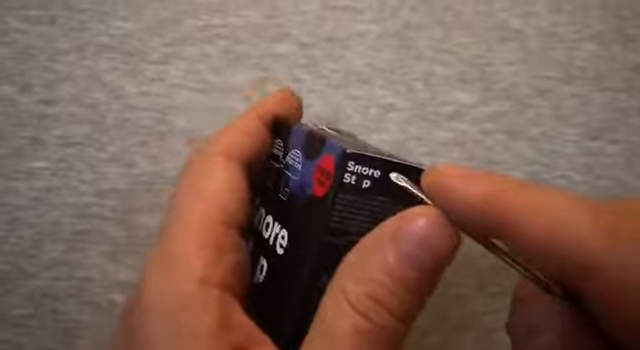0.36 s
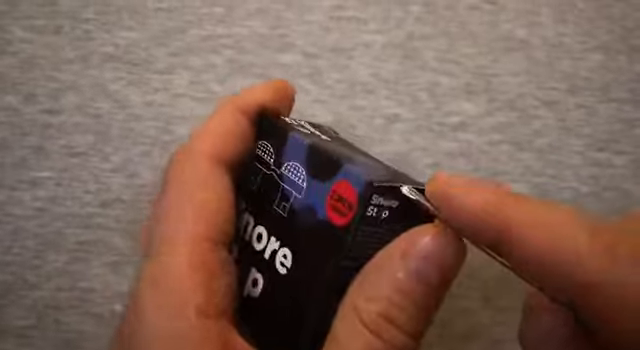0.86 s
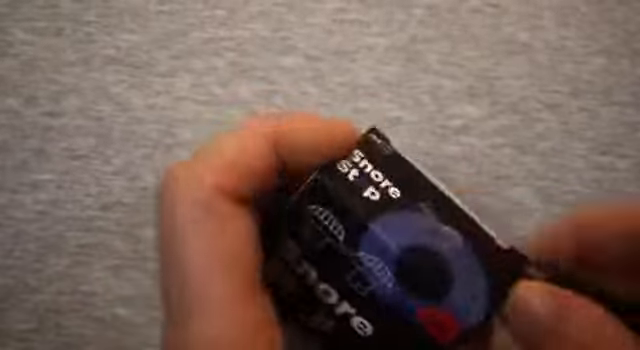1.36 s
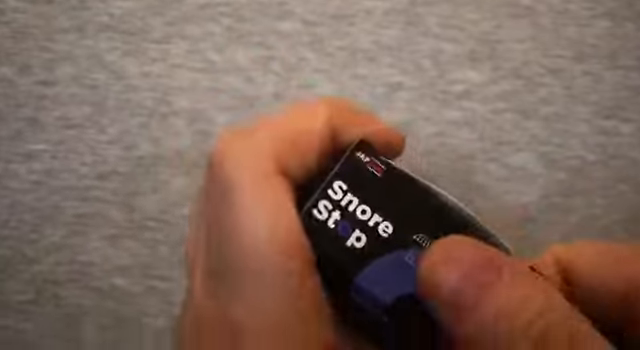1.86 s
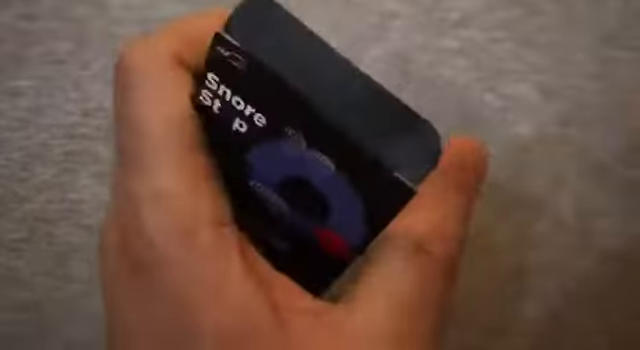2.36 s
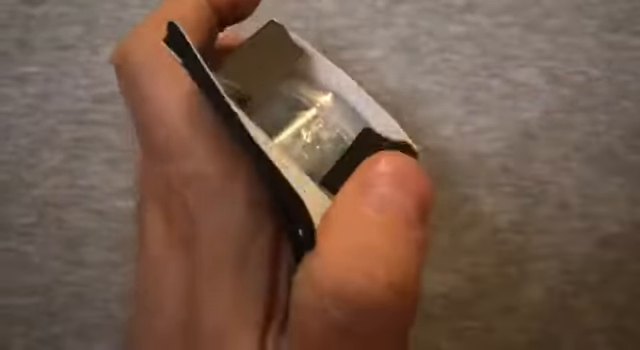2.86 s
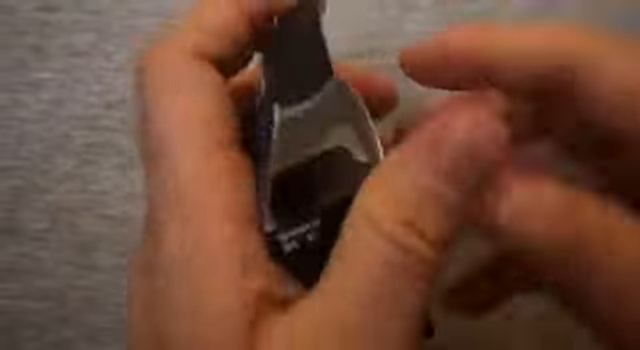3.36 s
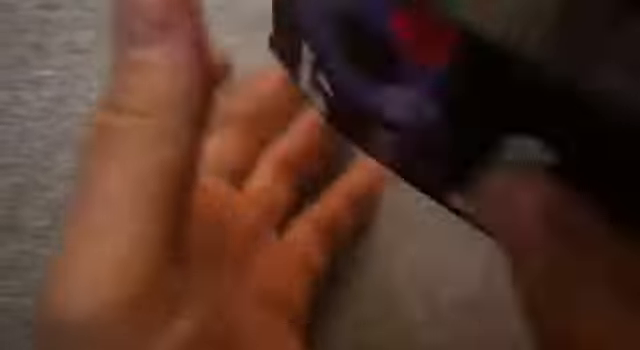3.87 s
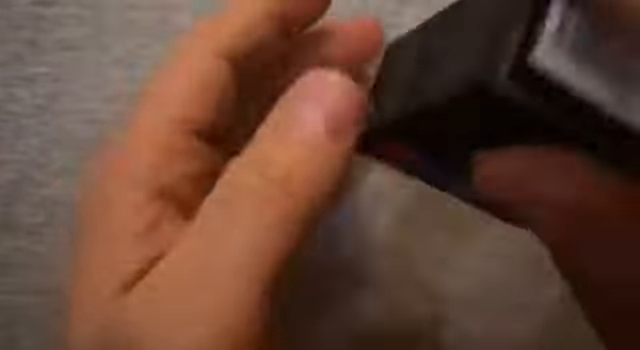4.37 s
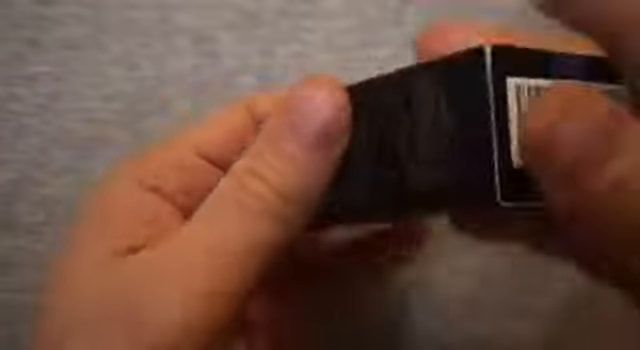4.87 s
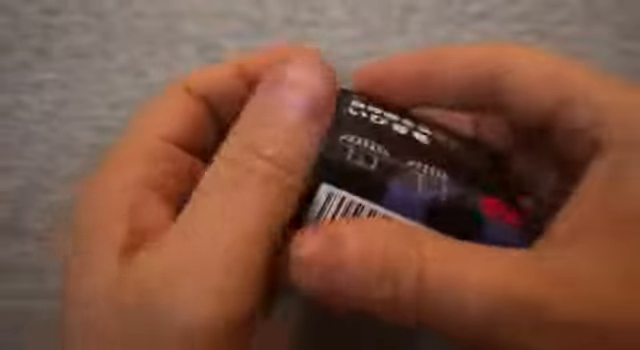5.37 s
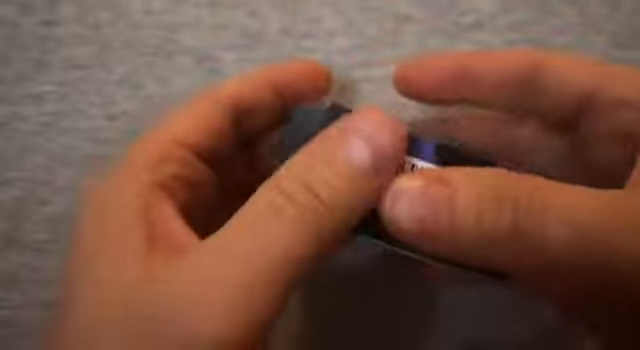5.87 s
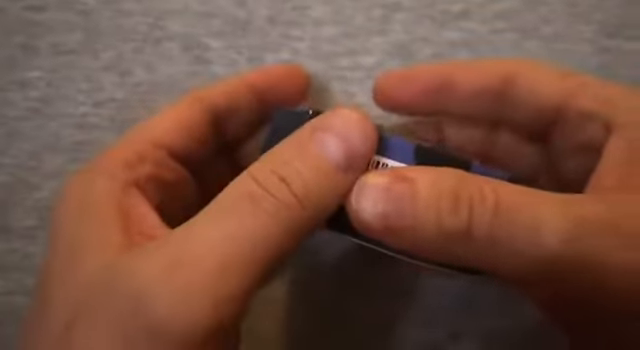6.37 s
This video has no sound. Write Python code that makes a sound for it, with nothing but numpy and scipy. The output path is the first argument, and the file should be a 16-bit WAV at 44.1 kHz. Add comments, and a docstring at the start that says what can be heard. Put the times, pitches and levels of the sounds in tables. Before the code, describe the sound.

Close-up handling of a small cardboard box: faint fingertip scratches, a hard double-edged snap as the seal tears, then papery rubbing, clicks and soft thuds.

```python
"""Two hands open a small cardboard box close to a microphone in a quiet room. A thin blade and fingers work
under the flap: filtered friction noise with clicks. Just before two seconds the seal tears with a loud snap:
many damped rings and noise bursts close together. Then skin and paper rub, scuff and scrape over the hollow
box, whose resonances colour the friction, with clicks and soft thuds (damped swings) between the strokes."""
import sys
import numpy as np
from scipy import signal
from scipy.fft import rfft, irfft, next_fast_len
from scipy.io import wavfile
from scipy.ndimage import uniform_filter1d, map_coordinates

SR = 44100
rng = np.random.default_rng(int(sys.argv[2]) if len(sys.argv) > 2 else 0)


def store_wav(level_fs):
    """Save 16-bit WAV to argv[1]."""
    pcm = np.round(np.clip(np.atleast_2d(level_fs), -1, 1) * 32767)
    wavfile.write(sys.argv[1], SR, pcm.T.astype(np.int16))


def attenuation_scalar(level_db):
    """Turn a level in dB into a linear amplitude multiplier (20 dB per decade)."""
    decades = np.asarray(level_db, float) / 20
    return 10 ** decades


N = 296793  # length [samples]

# resonances of the hollow box, five of the walls, then three of the flaps:
# (frequency [Hz], width [Hz], level [dB])
BOX_MODES = [(800, 180, -2), (1160, 280, -2), (1647, 230, 0.5), (1950, 230, 2), (2400, 790, -6.5),
             (3240, 1000, -6), (4050, 270, -1.5), (4356, 430, -6)]
# coloured bands of the hiss of skin on glossy card: (frequency [Hz], width [Hz], level [dB])
SKIN_BANDS = [(5180, 770, -1.5), (6410, 900, 0.5), (7360, 800, 0.5), (8640, 1100, -1), (9700, 990, -0.5),
              (11500, 1760, -6.5)]


def unit(x):
    """Scaled to rms 1."""
    return x / np.sqrt(np.mean(x ** 2) + 1e-20)


def along(points, hz):
    """Reads a curve of (frequency [Hz], value) points on a log frequency axis."""
    f, v = np.transpose(points)
    return np.interp(np.log(hz + 1), np.log(f + 1), v)


def wobble(rate):
    """A smooth random curve, rate knots a second."""
    knots = rng.standard_normal(int(N * rate / SR) + 4)
    return map_coordinates(knots, [np.arange(N) * rate / SR])


def filtered(x, response):
    """x times a complex response of frequency."""
    m = next_fast_len(N + 8192)  # room for the filter to ring out
    return irfft(rfft(x, m) * response(np.fft.rfftfreq(m, 1 / SR)), m)[..., :N]


def coloured(x, spectrum):
    """x given a (frequency [Hz], level [dB]) spectrum, rms 1."""
    return unit(filtered(x, lambda hz: attenuation_scalar(along(spectrum, hz))))


def mode(hz, centre_hz, width_hz, db):
    """Response of one resonance, which peaks at its centre."""
    return attenuation_scalar(db) * 1j * hz * width_hz / (centre_hz ** 2 - hz ** 2 + 1j * hz * width_hz)


def resonant(modes):
    """Response of a set of resonances, alternating in sign."""
    return lambda hz: sum((-1) ** k * mode(hz, *row) for k, row in enumerate(modes))


def ring(t, hz, t60, attack, sag):
    """A damped swing that swells first, its pitch sagging as the card slackens; peak 1."""
    cycles = hz * t * (1 + sag * (.15 - t / t60))
    swell = (1 - np.exp(-t / attack)) ** 2
    swing = np.sin(2 * np.pi * cycles) * attenuation_scalar(-60 * t / t60) * swell
    return swing / np.max(np.abs(swing))


def air():
    """Steady room noise with a faint fuzzy hum, noise squeezed through a narrow resonance."""
    # spectrum of the room air: (frequency [Hz], level [dB])
    air_spectrum = [(15, -38), (30, -8.5), (50, -0.5), (100, -6), (230, -0.5), (400, -9.5), (640, -16.5),
                    (760, -14), (1000, -13.5), (2500, -24), (3260, -22.5), (3900, -27), (4420, -16.5),
                    (5500, -25), (11500, -30.5), (16000, -78.5)]
    air_db, hum_db = -68, -77.5
    noise = coloured(rng.standard_normal(N), air_spectrum)
    hum = filtered(rng.standard_normal(N), lambda hz: mode(hz, centre_hz=542.6, width_hz=17, db=0) ** 2)
    return attenuation_scalar(air_db) * noise + attenuation_scalar(hum_db) * unit(hum)


def room(x):
    """Reverberation: a noise tail in which each frequency dies at its own speed, 3 ms after the sound."""
    # reverberation of the room: (frequency [Hz], t60 [s])
    decay_times = [(200, 0.27), (2000, 0.24), (10000, 0.3)]
    hz, t, z = signal.stft(rng.standard_normal(SR // 2), SR, nperseg=256)
    decay = attenuation_scalar(-60 * t / along(decay_times, hz)[:, None])
    tail = signal.istft(z * decay, SR, nperseg=256)[1]
    delayed = np.pad(x, (round(.003 * SR), 0))
    return signal.fftconvolve(delayed, tail / np.linalg.norm(tail))[:N]


def thuds():
    """A wall pushed in swings a few times, radiating little under its pitch, and shakes the palm."""
    # soft blows of palm and contents on the walls: (time [s], level [dB], pitch [Hz], t60 [s])
    blows = [(0.952, -55, 108, 0.027), (1.142, -50, 118, .032), (1.4375, -46.5, 242, 0.042),
             (1.5026, -38.5, 445, 0.02), (1.847, -20, 470, 0.017), (1.8571, -20, 480, 0.021),
             (1.858, -29.5, 175, 0.04), (1.91, -46, 240, .04), (2.186, -39, 230, 0.054),
             (2.515, -38.5, 229, 0.11), (2.563, -39, 158, 0.079), (2.6313, -42, 92, 0.044),
             (3.0558, -42.5, 188, 0.028), (3.096, -32, 300, 0.015), (3.178, -42, 156, 0.036),
             (3.8528, -49, 140, 0.048), (3.923, -36.5, 135, 0.028), (4.084, -53.5, 186, 0.1),
             (4.213, -39.5, 190, 0.059), (4.361, -39.5, 230, 0.038), (4.4093, -47.5, 210, 0.035),
             (4.573, -44, 124, 0.039), (4.6673, -43, 280, 0.019), (4.824, -50, 242, 0.047),
             (5.286, -45, 170, 0.033), (6.1768, -48, 170.7, 0.027), (6.178, -52, 400, .02),
             (6.7, -50, 150, .05), (2.44, -55, 198, 0.071), (2.501, -46, 220, .04), (1.85, -26, 227, 0.048),
             (3.934, -54, 60, 0.081), (3.86, -54, 65, .08), (3.96, -49, 150, .05), (3.99, -56, 200, .1),
             (4.227, -46, 75, 0.075), (4.366, -39.5, 110, 0.043), (4.42, -54, 75, .06),
             (2.585, -45, 190, 0.073), (2.66, -51, 110, 0.056), (4.185, -54, 100, 0.054),
             (3.333, -46.5, 298, 0.022)]
    # spectrum of the shaken palm: (frequency [Hz], level [dB])
    shaken_palm = [(30, -21.5), (60, -3), (150, -2.5), (300, -10), (700, -46)]
    # deeper blows shake the palm more: shake over the blow at 150 Hz [dB], fall with pitch [dB per octave]
    shake_at_150_db, fall_db = -16.5, 6.5
    t = np.arange(SR // 5) / SR
    walls, shake = np.zeros((2, N + SR))
    for s, db, hz, t60 in blows:
        start = round(s * SR)
        swing = ring(t, hz, t60, attack=.15 / hz, sag=0.42)
        low_cut = signal.butter(2, .5 * hz, "high", fs=SR)
        walls[start:][:len(t)] += attenuation_scalar(db) * signal.lfilter(*low_cut, swing)
        shake_db = db + shake_at_150_db - fall_db * np.log2(hz / 150)
        shake[start:][:len(t)] += attenuation_scalar(shake_db - 60 * t / (3.8 * t60)) * (1 - np.exp(-t / 0.0022))
    return walls[:N] + shake[:N] * coloured(rng.standard_normal(N), shaken_palm)


def cracks():
    """Sharp treble cracks, mostly the bright part of the snaps: short bursts of noise in the skin's bands."""
    # treble cracks: (time [s], level before the trim below [dB], t60 [s])
    treble_cracks = [(0.333, -57, 0.0063), (0.9483, -25, 0.008), (1.1657, -32, 0.008), (1.3139, -45, 0.008),
                     (1.4379, -24, 0.0072), (1.544, -36.5, 0.008), (1.7754, -44, 0.008),
                     (1.8467, -19.5, 0.0087), (1.8505, -12, .006), (1.857, -13, .01), (1.908, -26, .01),
                     (1.8929, -21.5, 0.008), (1.8983, -19.5, 0.008), (2.0268, -37, 0.008),
                     (2.0403, -40, 0.008), (2.3324, -37, 0.0087), (3.0485, -37, 0.008),
                     (3.0944, -21.5, 0.008), (3.1765, -20.5, 0.0088), (3.3119, -38, 0.0073),
                     (3.329, -23, 0.0096), (3.5124, -34, 0.0087), (3.702, -40, 0.008), (3.7199, -34, 0.008),
                     (3.843, -31, 0.008), (3.902, -38, 0.008), (4.0667, -36, 0.01), (4.2105, -41, 0.01),
                     (4.3433, -37, 0.008), (4.359, -35, 0.008), (4.4069, -34, 0.008), (4.567, -31, 0.0088),
                     (4.669, -23, 0.0066), (4.8344, -35, 0.008), (4.8898, -40, 0.008),
                     (5.2295, -34, 0.0081), (5.3497, -26, 0.008), (5.3612, -22, 0.008), (5.497, -27, 0.013),
                     (5.5982, -42, 0.0083), (5.8185, -41.5, .007), (5.712, -43, .008), (5.735, -42.5, .007),
                     (1.7165, -42.5, 0.0073), (1.185, -37, .007), (1.142, -31, .007), (4.4015, -37, .008),
                     (6.631, -37, 0.0079)]
    trim_db = -2.5
    t, shape = np.arange(SR // 20) / SR, np.zeros(N + SR)
    for s, db, t60 in treble_cracks:
        fade = attenuation_scalar(db + trim_db - 60 * t / t60)
        shape[round(s * SR):][:len(t)] += fade * (1 - np.exp(-t / 0.0022))
    return shape[:N] * unit(filtered(rng.standard_normal(N), resonant(SKIN_BANDS)))


def scrapes():
    """An edge dragged along the card sings: narrow noise around a gliding pitch, pressed unevenly."""
    # drags: (time [s], length [s], level [dB], first pitch [Hz], last pitch [Hz])
    drags = [(.965, 0.044, -53, 1153, 1130), (1.215, 0.041, -56, 3300, 3270), (1.209, .02, -55, 4300, 4200),
             (1.238, .018, -57, 6200, 6000), (1.361, 0.023, -47, 1153, 1042),
             (1.372, 0.012, -48, 5180, 5080), (1.919, 0.082, -70, 4150, 3980),
             (1.92, 0.085, -56, 2415, 2520), (2.016, 0.02, -51, 3200, 3300),
             (2.022, 0.012, -41, 5700, 5910), (2.038, 0.0224, -43, 6060, 5450),
             (2.039, .016, -42, 3320, 3370), (2.104, 0.058, -56, 3400, 3560),
             (2.153, 0.0405, -48.5, 1800, 1408), (2.438, .04, -64.5, 1895, 1860),
             (2.501, 0.176, -59.5, 2004, 1887), (2.52, 0.14, -56.5, 3300, 3600),
             (2.498, .2, -61.5, 4300, 4660), (2.551, .17, -57.5, 3036, 3200),
             (2.67, 0.057, -62, 3520, 3380), (.005, 0.065, -62, 1950, 1800), (.11, 0.073, -68, 2050, 2050),
             (.225, .04, -74, 2000, 2050), (3.102, 0.041, -51.5, 4130, 4160), (3.1, 0.044, -53, 1903, 2060),
             (3.349, .065, -54, 4100, 4000), (3.391, 0.02, -50, 906, 724), (4.403, 0.086, -53, 3850, 3920),
             (4.476, 0.035, -52.5, 1800, 1880), (4.474, 0.016, -47.5, 800, 849),
             (4.545, 0.075, -50, 4320, 3890), (4.731, 0.083, -55.5, 3900, 3410),
             (4.831, 0.02, -56, 800, 800), (4.936, .04, -53, 1890, 2036), (5.005, 0.019, -50, 4500, 5240),
             (5.069, .05, -61, 1595, 1650), (5.041, 0.142, -58.5, 900, 951), (4.7, .05, -60.5, 1097, 1007),
             (5.147, 0.02, -53, 8500, 7550), (5.252, 0.035, -45.5, 1950, 1950),
             (5.255, 0.028, -49, 8000, 7800), (.94, 0.0726, -47.5, 2000, 1750),
             (.965, 0.035, -55.5, 5660, 5280), (0.954, .05, -61, 3300, 3230),
             (1.083, 0.044, -61, 1800, 1677), (1.893, .012, -39.5, 5730, 6110),
             (1.872, 0.013, -39.5, 4500, 4620), (3.471, 0.098, -60, 4300, 4240),
             (3.54, 0.064, -65, 2100, 2000), (3.512, 0.017, -55, 3550, 3530),
             (3.699, 0.039, -46, 1585, 1480), (3.713, 0.036, -47, 5000, 4930),
             (3.8, 0.038, -58, 3500, 3350), (3.844, 0.0294, -51, 5970, 5720),
             (3.841, 0.03, -43, 9500, 9300), (3.9, 0.021, -56, 2210, 2000), (3.958, 0.037, -59, 3500, 3550),
             (4.091, 0.033, -60, 3500, 3430), (4.405, 0.022, -50, 2010, 2000),
             (5.37, 0.036, -57.5, 4170, 4160), (5.492, 0.016, -54, 3680, 3620),
             (5.522, 0.054, -52, 7200, 6940), (5.73, 0.057, -54, 4260, 4150),
             (5.775, 0.06, -61, 2885, 2833), (6.612, 0.0464, -56.5, 3600, 3040),
             (6.632, 0.029, -52, 6500, 6760), (6.638, 0.023, -57, 1188, 1170),
             (6.678, 0.024, -56, 5700, 5500)]
    # sharpness (first pitch over width), rise and fall [s], unevenness of the drag [dB]
    sharpness, edge_s, uneven_db = 5.1, .008, 1.5
    settle = 600  # samples for the narrow filter to fill
    out, uneven = np.zeros(N), attenuation_scalar(uneven_db * wobble(150))
    grit = rng.standard_normal((len(drags), 2, SR // 4))
    for (s, length, db, first_hz, last_hz), pair in zip(drags, grit):
        t = np.arange(min(round(length * SR), SR // 4 - settle)) / SR
        pole = np.exp(-np.pi * first_hz / sharpness / SR)
        slow = signal.lfilter([1], np.poly([pole, pole]), pair)
        a, b = slow[:, settle:][:, :len(t)]
        # the slow noise pair is carried up to the gliding pitch
        phase = 2 * np.pi * (first_hz * t + (last_hz - first_hz) * t ** 2 / (2 * length))
        sung = unit(a * np.cos(phase) + b * np.sin(phase))
        edge = np.clip(np.minimum(t, length - t) / edge_s, 0, 1)
        out[round(s * SR):][:len(t)] += attenuation_scalar(db) * edge * sung
    return out * uneven


def friction(catches, spread_db, grain_db, patchy_db):
    """Sliding noise: a patchy rush plus fibres catching in clumps, some larger than the rest."""
    z = signal.stft(rng.standard_normal(N), nperseg=256)[2]
    field = uniform_filter1d(rng.standard_normal(z.shape), size=4, axis=0)
    field = uniform_filter1d(field, size=14, axis=1)
    rush = signal.istft(z * attenuation_scalar(patchy_db * unit(field)), nperseg=256)[1][:N]
    chance, size, sign = rng.random((3, N))
    caught = chance < catches * attenuation_scalar(5 * wobble(30)) / SR  # catches: about this many a second
    grains = caught * attenuation_scalar(-spread_db * np.log(size + .03)) * np.sign(sign - .5)
    return unit(unit(rush) + attenuation_scalar(grain_db) * unit(grains))


def gripped(force, modes, grip_db):
    """The shifting grip frees and damps each resonance at random, independently of the others."""
    parts = []
    for k, row in enumerate(modes):
        freed = (-1) ** k * attenuation_scalar(grip_db * wobble(14))
        parts.append(freed * filtered(force, lambda hz: mode(hz, *row)))
    return unit(sum(parts))


def contact(rub_db, slick_db):
    """Powers of wall rub, flap rub and skin hiss; the flaps ring partway between the other two."""
    flap_share, flap_db = 0.51, -0.5  # share of the slickness, then offset [dB]
    flap_rub_db = rub_db + flap_share * slick_db + flap_db
    return attenuation_scalar(2 * np.array([rub_db, flap_rub_db, rub_db + slick_db]))


def pressure():
    """Gains of rumble, wall rub, flap rub and hiss: slow handling and quick strokes add in power."""
    # slow handling: (time [s], grip as wall rub [dB], slickness as skin hiss over wall rub [dB])
    handling = [(0.0, -61.5, -17), (0.12, -71, -12), (0.6, -82.5, -9), (0.9, -69, -9), (1.05, -61, -16),
                (1.1, -58.5, -6.5), (1.35, -57.5, -10), (1.8, -55, -14), (1.99, -57.5, -17),
                (2.07, -56, -9), (2.17, -64, 7), (2.24, -63, -5), (2.37, -74, 7), (2.42, -66.5, 6.5),
                (2.55, -53, -15), (2.7, -80.5, -6), (2.9, -64, -1), (3.14, -63, -2), (3.24, -62, -12),
                (3.3, -63, -13), (3.58, -61, 3), (3.9, -62.5, -16), (4.16, -69.5, -9.5), (4.38, -74, -1),
                (4.5, -54.5, -7.5), (4.56, -55.5, 3), (4.7, -57, 2.5), (4.92, -54.5, 0),
                (5.05, -55.5, -3.5), (5.19, -58.5, -1.5), (5.32, -54.5, -19), (5.4, -61, -9),
                (5.44, -66.5, -9), (5.52, -68, -4), (5.74, -55.5, -4), (5.87, -57, -7.5), (6.0, -78, 4),
                (6.58, -74.5, -7), (6.73, -60.5, -14.5)]
    # quick strokes over the card: (time [s], length [s], wall rub before the stroke's shape [dB],
    # slickness [dB], place of the peak before clipping [0-1])
    scuffs = [(0.0, 0.2, -73, -38, 0.1), (0.538, 0.036, -64.5, -38, 0.6), (0.617, 0.016, -55.5, -30, 0.5),
              (0.82, 0.021, -57.5, -20, 0.23), (0.88, 0.024, -60.5, -0.5, 0.4),
              (0.927, .025, -55.5, -9, 0.9), (0.944, 0.05, -44, -15, 0.47), (0.986, 0.048, -52.5, -6.5, .4),
              (1.081, 0.077, -59.5, 1, 0.6), (1.138, 0.067, -44.5, -12, 0.35),
              (1.211, 0.05, -55, -3.5, 0.53), (1.313, 0.028, -52.5, -5, 0.14),
              (1.364, 0.022, -43.5, -20, 0.66), (1.428, 0.021, -37.5, -4.5, 0.7),
              (1.484, 0.041, -52, -2, 0.34), (1.545, 0.018, -61.5, 7, .6), (1.769, 0.015, -50, -3.5, 0.8),
              (1.846, 0.006, -20.5, -2, 0.44), (1.855, 0.0076, -20.5, -5, 0.5),
              (1.863, 0.058, -41.5, -5.5, 0.1), (1.82, 0.021, -57, 2, .8), (1.893, 0.014, -52, 18, .5),
              (1.897, .017, -57.5, 13.5, .7), (1.913, 0.049, -50, -20, 0.13), (1.945, 0.064, -50, -10, 0.7),
              (2.01, 0.027, -55, -1, 0.4), (2.033, 0.025, -52.5, 5.5, 0.36),
              (2.088, 0.073, -65.5, 14.5, 0.4), (2.133, .045, -62.5, 15, .6),
              (2.137, 0.058, -52.5, 3.5, 0.8), (2.193, 0.19, -64, -1.5, 0.04), (2.486, 0.24, -59, -2, 0.37),
              (2.96, 0.097, -61, 2, 0.43), (3.042, 0.046, -45, -2.5, 0.2), (3.095, 0.096, -51.5, 4, 0.58),
              (3.211, 0.059, -54, -8, 0.3), (3.272, 0.015, -55, -12, 0.3), (3.33, 0.081, -54, 4.5, 0.48),
              (3.445, 0.022, -55, -5, 0.16), (3.514, 0.025, -51.5, 0, 0.5),
              (3.611, 0.025, -68.5, 14.5, 0.6), (3.687, 0.068, -47, -1, 0.6),
              (3.771, 0.073, -73.5, 19.5, 0.57), (3.833, 0.039, -52.5, 5.5, 0.25),
              (3.895, 0.035, -55.5, 6.5, 0.53), (3.913, 0.1, -60.5, 0.5, 0.56),
              (4.047, 0.11, -63.5, 5, 0.2), (4.184, 0.027, -65, -4, 0.8), (4.209, 0.014, -57, -1.5, 0.1),
              (4.221, 0.014, -61.5, -9, 0.35), (4.313, 0.049, -64, -2, 0.6),
              (4.353, 0.015, -49.5, -2.5, 0.3), (4.399, 0.027, -54.5, 3, 0.23),
              (4.411, 0.083, -59.5, 14.5, 0.43), (4.54, 0.064, -56, -8, 0.85),
              (4.669, 0.015, -37, -7.5, 0.25), (4.675, 0.013, -46, 2, .6), (4.722, 0.089, -57, -6, 0.7),
              (4.822, 0.027, -47, 0.5, 0.9), (4.887, 0.017, -53.5, 2.5, .3), (5.223, 0.03, -58, 9, 0.45),
              (5.235, 0.057, -51, 6, 0.6), (5.346, 0.026, -51, 5.5, 0.5), (5.468, 0.025, -56, -8, 0.55),
              (5.485, 0.029, -49, 0, 0.5), (5.5, 0.096, -51.5, 2, 0.43), (5.6, 0.041, -62, 12.5, 0.34),
              (5.711, 0.071, -56, 2.5, 0.78), (5.859, 0.045, -62, 3.5, 0.53),
              (6.315, 0.11, -67.5, -7.5, 0.18), (6.583, 0.094, -56.5, -2, 0.57),
              (6.651, 0.066, -54, 1, 0.58)]
    # the palm rumble follows the wall rub gently: level [dB] at a rub of grip_at_db, and dB per dB
    rumble_db, grip_at_db, follows = -65, -58.5, .3
    t = np.arange(N) / SR
    s, *controls = np.transpose(handling)
    grip_db, slick_db = [np.interp(t, s, c) for c in controls]
    power = contact(grip_db, slick_db)
    for start, length, stroke_db, stroke_slick_db, top in scuffs:
        span = slice(round(start * SR), round((start + length) * SR))
        u, top = (t[span] - start) / length, np.clip(top, .1, .8)
        edge = np.clip(np.minimum(u / top, (1 - u) / (1 - top)), 0, 1)
        power[:, span] += np.outer(contact(stroke_db, stroke_slick_db), 1.44 * edge ** 1.22)
    wall_db = 10 * np.log10(power[0])
    return [attenuation_scalar(rumble_db + follows * (wall_db - grip_at_db)), *np.sqrt(power)]


def rubbing():
    """Friction rings the walls (low modes) and flaps (high modes); the skin adds hiss, the palm a rumble."""
    # spectrum of the palm rumble: (frequency [Hz], level [dB])
    palm_spectrum = [(30, -30), (60, -4), (120, -4.5), (220, -0.5), (320, -9), (500, -7), (750, -7.5),
                     (1500, -55)]
    rumble, wall_rub, flap_rub, hiss = pressure()
    stick = wobble(50) + wobble(220)  # contact comes and goes quickly
    force = friction(catches=260, spread_db=3, grain_db=-3.5, patchy_db=1.5)
    walls = wall_rub * gripped(force, BOX_MODES[:5], grip_db=3.0)
    flaps = flap_rub * gripped(force, BOX_MODES[5:], grip_db=1.0)
    skin_force = 0.11 * force + friction(catches=1300, spread_db=2.5, grain_db=-6, patchy_db=1.0)
    skin = hiss * gripped(skin_force, SKIN_BANDS, grip_db=2.0)
    palm = rumble * attenuation_scalar(3.0 * wobble(25)) * coloured(rng.standard_normal(N), palm_spectrum)
    return attenuation_scalar(1.1 * stick) * (walls + flaps) + attenuation_scalar(1.3 * stick) * skin + palm


def ticks(count):
    """Small edges let go at random moments, harder as the walls are rubbed harder, up to a limit."""
    # rub where ticks stop growing [dB], tick level over the rub [dB], scatter [dB]
    top_db, over_rub_db, scatter_db = -48.5, 4, 4.5
    # middle pitch [Hz], spread either way [octaves], t60 [s]
    middle_hz, octaves, t60 = 1800, 1.2, 0.0043
    when, size, pitch = rng.random((count, 3)).T
    wall_rub = pressure()[1]
    rub_db = 20 * np.log10(wall_rub[(when * N).astype(int)])
    db = np.minimum(rub_db, top_db) + over_rub_db - scatter_db * np.log(size + 0.065)
    hz = middle_hz * 2 ** (octaves * (2 * pitch - 1))
    return [(a * N / SR, b, c, t60) for a, b, c in zip(when, db, hz)]


def snaps():
    """Each release rings the freed edge, ticks and jolts the whole box and cracks in the treble."""
    # card edges letting go: (time [s], level before the part trims below [dB], pitch [Hz], t60 [s])
    edge_releases = [(.3349, -24, 1800, 0.0053), (.6265, -42, 1950, 0.0068), (.63, -42, 850, .008),
                     (.562, -45, 1900, 0.0094), (.366, -45, 600, 0.012), (.8294, -37, 865, 0.0083),
                     (.9494, -24, 1950, 0.012), (.9496, -23.5, 3980, 0.0032), (1.1428, -45, 3000, 0.0053),
                     (1.502, -29.5, 3220, 0.021), (1.895, -30, 633, .018), (4.8902, -31.5, 4400, 0.0136),
                     (1.1686, -24, 2520, 0.012), (1.1853, -31, 1990, 0.0069), (1.3128, -32.5, 1193, 0.0086),
                     (1.3755, -32, 940, 0.036), (1.388, -28.5, 1730, 0.019), (1.41, -29, 1650, 0.021),
                     (1.426, -29, 1650, 0.025), (1.4368, -15, 1640, 0.019), (1.4383, -15.5, 1095, 0.026),
                     (1.4456, -19.5, 1155, 0.02), (1.463, -26, 1220, 0.003), (1.5035, -20, 1640, 0.008),
                     (1.5443, -32.5, 1800, 0.0082), (1.716, -36, 1040, 0.0074), (1.581, -36, 1500, 0.0052),
                     (1.596, -38, 1800, 0.0079), (1.68, -39, 1900, .008), (1.766, -39, 1820, .007),
                     (1.694, -38, 3300, .006), (1.716, -41, 3000, 0.0051), (1.8337, -32, 1940, 0.01),
                     (1.8468, -5.5, 800, 0.017), (1.8454, -6, 4370, 0.0049), (1.8489, -5.5, 4070, 0.0045),
                     (1.8482, -10.5, 9100, 0.0048), (1.8483, -13.5, 7500, .004), (1.8507, -14, 5400, .005),
                     (1.8935, -19.5, 7540, .003), (1.901, -25, 3800, .006), (1.8507, -0.5, 4150, 0.007),
                     (1.851, -15.5, 927, 0.037), (1.8565, -14, 1670, 0.013), (1.859, -8.5, 1890, 0.006),
                     (1.8685, -19, 745, 0.0067), (2.1485, -28, 1800, 0.021), (2.027, -43, 2830, .007),
                     (1.997, -30.5, 3400, .007), (1.911, -35.5, 2000, .008), (1.883, -28, 2300, .007),
                     (2.1875, -27, 2480, 0.015), (2.334, -39.5, 3400, 0.0082), (2.525, -33, 500, 0.0068),
                     (2.623, -32, 523, 0.0094), (2.898, -36, 4020, 0.0046), (3.0509, -28.5, 1850, 0.0095),
                     (3.0565, -25.5, 3240, 0.0074), (3.096, -26.5, 2100, 0.0046), (3.1783, -17, 636, 0.013),
                     (3.3121, -23.5, 4000, 0.0044), (3.3141, -28, 1860, 0.01),
                     (3.3292, -16.5, 4110, 0.0077), (3.3887, -32.5, 1150, 0.0052), (3.4, -32, 740, .01),
                     (3.33, -31, 6200, .006), (3.449, -43, 2800, 0.0052), (3.696, -34, 1600, 0.0071),
                     (3.5128, -30.5, 5300, 0.0056), (3.7026, -31, 1980, 0.012), (3.7192, -36, 1340, 0.01),
                     (3.8428, -32.5, 720, 0.013), (4.0666, -38, 3690, 0.011), (4.2138, -33, 710, 0.011),
                     (4.3471, -32.5, 790, 0.0088), (4.406, -33.5, 2000, 0.006), (4.569, -19.5, 4670, 0.01),
                     (4.5821, -32.5, 1710, 0.0077), (4.656, -28, 760, 0.01), (4.6712, -9.5, 1950, 0.02),
                     (4.6718, -25, 800, 0.023), (4.672, -24.5, 1270, 0.013), (4.8252, -28, 2100, 0.007),
                     (4.844, -33, 810, 0.011), (4.9934, -31.5, 1960, 0.0081), (5.0212, -37, 1920, 0.012),
                     (5.0545, -39, 730, 0.014), (5.1374, -40, 1950, 0.0076), (5.138, -36, 920, 0.0075),
                     (4.778, -36, 3550, 0.017), (4.91, -38, 1900, 0.0089), (4.936, -44, 1900, 0.006),
                     (4.955, -38, 2100, .007), (5.096, -41, 1500, 0.0064), (4.4834, -36, 1760, 0.021),
                     (2.1675, -36, 2510, 0.03), (3.2406, -37.5, 1906, 0.0057), (3.6729, -34, 1930, 0.0072),
                     (4.326, -42, 710, 0.036), (5.253, -37, 1970, 0.02), (5.276, -33, 1900, .01),
                     (5.2879, -27, 1040, 0.0057), (5.35, -29, 4300, 0.0063), (5.3618, -27, 4160, 0.008),
                     (5.5996, -27, 1290, 0.0089), (5.8188, -34.5, 1700, 0.005), (5.679, -48, 719, 0.0092),
                     (5.736, -38, 4300, .006), (5.264, -31, 1910, 0.0092), (6.624, -35.5, 1204, 0.012),
                     (6.63, -36.5, 1230, 0.0136), (1.142, -38, 1660, 0.0064), (1.156, -32, 1390, 0.007),
                     (1.169, -32, 5500, .008), (1.197, -34, 800, .01), (1.215, -44, 3270, .007),
                     (1.4375, -14, 2710, 0.014), (1.438, -30, 4330, 0.0084), (1.507, -29.5, 800, 0.0096),
                     (1.629, -36, 1690, 0.0081), (1.66, -36.5, 1760, .007), (1.693, -41, 1300, 0.011),
                     (1.776, -39, 1660, 0.0077), (2.0395, -34, 3300, 0.0062), (2.187, -28, 1420, .008),
                     (2.191, -34, 680, 0.021), (2.564, -39.5, 690, 0.0065), (2.992, -39, 1750, 0.01),
                     (3.12, -35, 1800, 0.0069), (3.138, -34, 2100, .008), (3.282, -41, 5300, .006),
                     (3.095, -30, 6400, .006), (3.059, -34, 420, 0.014), (3.149, -32, 644, 0.011),
                     (3.177, -23, 5800, 0.0081), (3.177, -26, 4080, 0.0058), (3.178, -24.5, 2100, 0.0045),
                     (3.179, -27.5, 1210, 0.015), (3.281, -36, 1850, 0.0088), (3.328, -21.5, 3130, 0.0074),
                     (3.329, -25, 4850, 0.0074), (3.445, -38, 3410, 0.0063), (4.525, -42, 1745, 0.0079),
                     (4.654, -39, 2400, .006), (4.671, -17, 7300, 0.0049), (4.766, -38, 3540, 0.0054),
                     (4.864, -48, 3100, .006), (4.891, -36, 1300, 0.0075), (5.022, -35, 825, 0.0099),
                     (5.054, -36, 1900, 0.008), (5.318, -38.5, 650, 0.014), (1.869, -16.5, 3290, 0.0068),
                     (3.918, -37.5, 800, 0.0077), (4.116, -42.5, 1204, 0.011), (4.345, -33, 3500, 0.0089),
                     (4.356, -32, 1970, .008), (4.366, -37, 800, 0.012), (4.409, -40, 800, 0.0087),
                     (4.576, -33, 706, 0.01), (5.494, -36.5, 1330, 0.01), (5.517, -35, 900, 0.0046),
                     (5.692, -46, 1950, .007), (5.869, -40, 1210, 0.0078), (6.515, -50.5, 2040, 0.0053),
                     (6.631, -36, 3110, 0.0065), (6.71, -37, 1210, 0.01)]
    # higher edges crack more: crack over the release at 2 kHz [dB], rise [dB per octave]
    crack_at_2k_db, crack_rise_db = -22.5, 4.5
    # harder releases crack more: dB per dB over a release of hard_db
    crack_grows, hard_db = 0.24, -30.5
    # the thinnest, highest edges jolt the box less [dB per octave above 2.5 kHz]
    jolt_fall_db = 5.5
    t = np.arange(SR // 20) / SR
    edge, jolt, crack = np.zeros((3, N + len(t)))
    noise = unit(filtered(rng.standard_normal(N), resonant(SKIN_BANDS)))
    releases = edge_releases + ticks(count=700)
    bursts = rng.standard_normal((len(releases), len(t)))
    for (s, db, hz, t60), burst in zip(releases, bursts):
        at = slice(round(s * SR), round(s * SR) + len(t))
        start = (1 - np.exp(-t / (0.059 * t60))) ** 2
        fade = attenuation_scalar(-60 * t / (1.1 * t60))
        edge[at] += attenuation_scalar(db - 5.5) * ring(t, hz, t60, attack=0.039 * t60, sag=0.087)
        # a shorter, broader flick
        edge[at] += attenuation_scalar(db - 12.5) * ring(t, 1.2 * hz, 0.39 * t60, attack=0.018 * t60, sag=0.79)
        jolt_db = db - jolt_fall_db * max(np.log2(hz / 2500), 0)
        jolt[at] += attenuation_scalar(jolt_db + 4.0) * burst * start * fade
        jolt[at.start + round(.1 * t60 * SR)] += attenuation_scalar(jolt_db + 8.5)  # a single tick
        crack_db = db + crack_at_2k_db + crack_rise_db * np.log2(hz / 2000) + crack_grows * (db - hard_db)
        crack[at] += attenuation_scalar(crack_db) * np.sqrt(start) * fade
    edges_heard = filtered(edge[:N], lambda hz: (1j * hz / (250 + 1j * hz)) ** 2)  # little bass
    box = filtered(jolt[:N], resonant(BOX_MODES))
    return edges_heard + box + crack[:N] * noise


def scene():
    """Hands and box, the room's answer and its quiet air."""
    near = rubbing() + scrapes() + snaps() + cracks() + thuds()
    return (near + attenuation_scalar(-16.5) * room(near) + air())[None]


def top_cut(x):
    """Nothing passes above the cut-off."""
    return signal.sosfilt(signal.butter(12, 12810, fs=SR, output="sos"), x)


def record(dry):
    """The microphone rounds the loudest peaks and drops the deep bass and the top."""
    rounded = dry / (1 + np.abs(dry / .8) ** 4) ** (1 / 4)

    def microphone(hz):
        """Bass falls below 30 Hz, treble steeply above 11.6 kHz."""
        return (1j * hz / (30 + 1j * hz)) ** 3 / np.sqrt(1 + (hz / 11600) ** 70)

    return top_cut(filtered(rounded, microphone))


dry = scene()
out = record(dry)
store_wav(out)
```